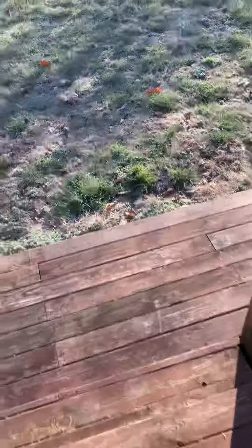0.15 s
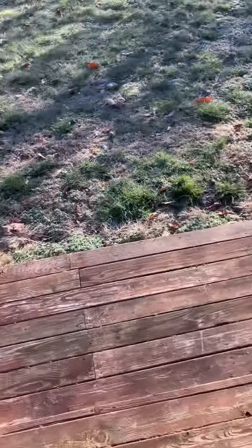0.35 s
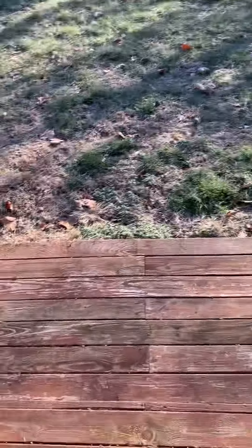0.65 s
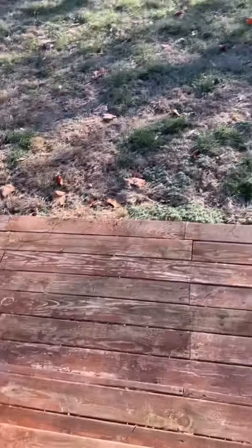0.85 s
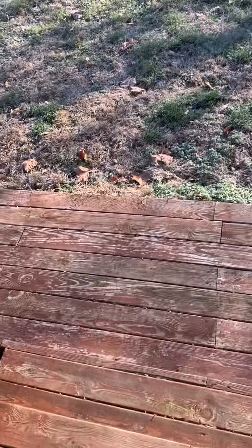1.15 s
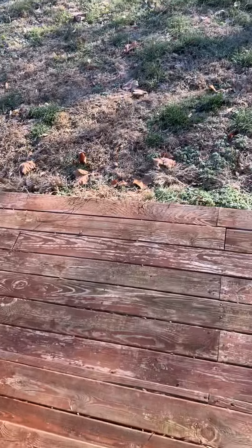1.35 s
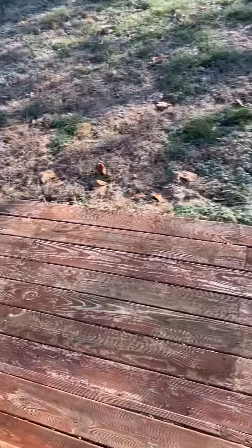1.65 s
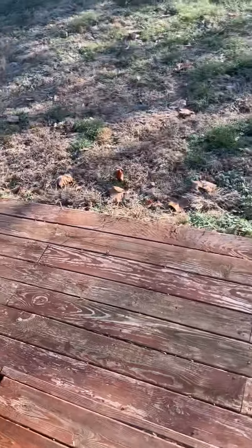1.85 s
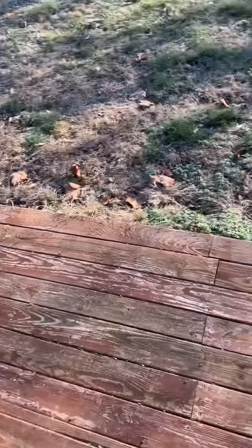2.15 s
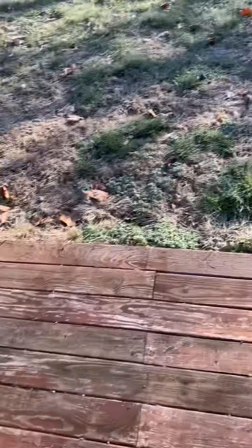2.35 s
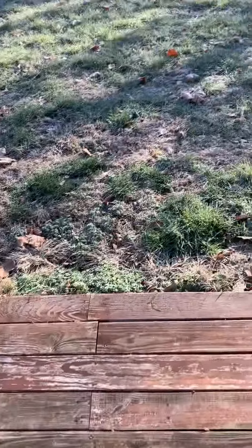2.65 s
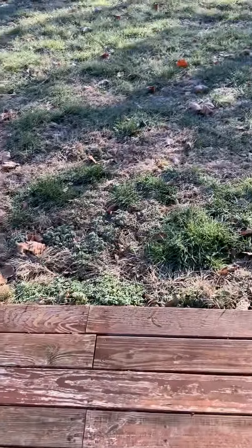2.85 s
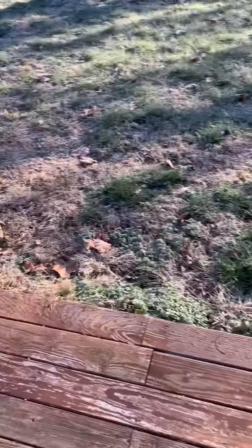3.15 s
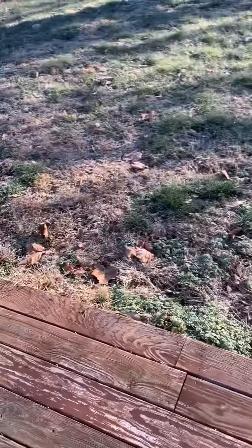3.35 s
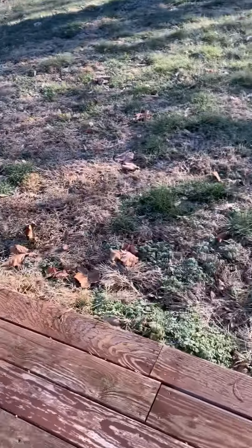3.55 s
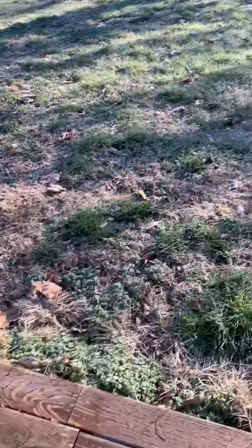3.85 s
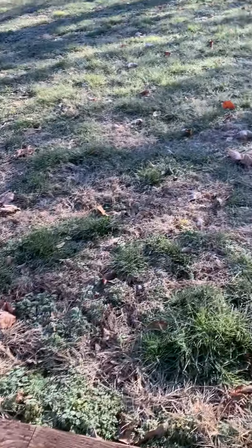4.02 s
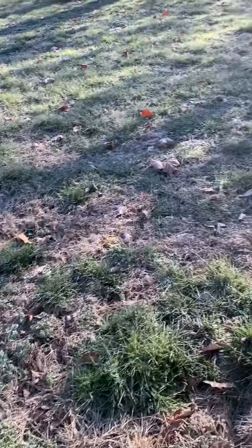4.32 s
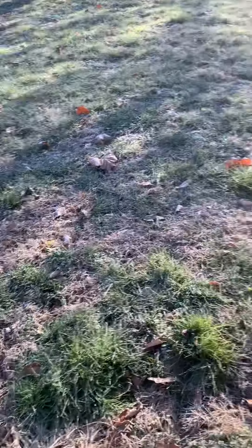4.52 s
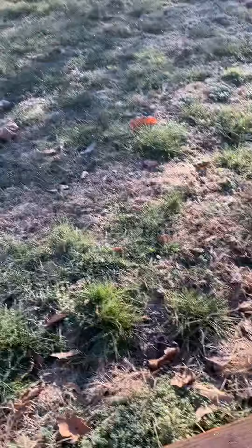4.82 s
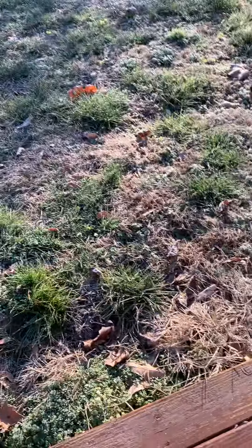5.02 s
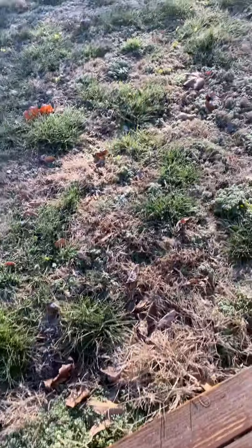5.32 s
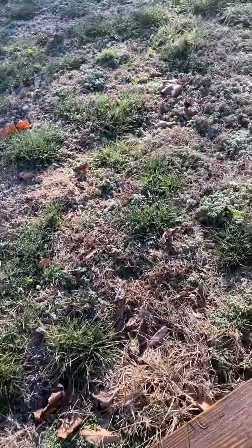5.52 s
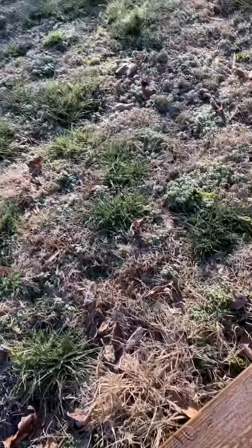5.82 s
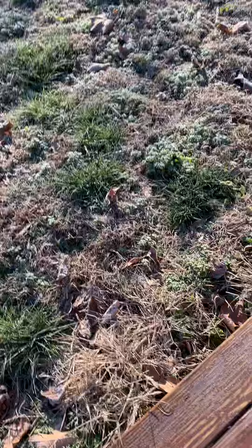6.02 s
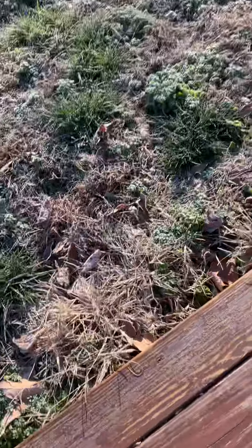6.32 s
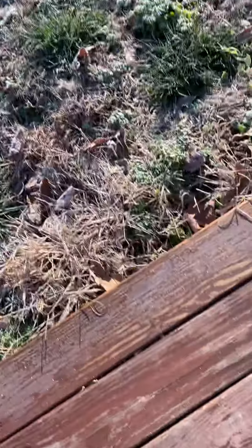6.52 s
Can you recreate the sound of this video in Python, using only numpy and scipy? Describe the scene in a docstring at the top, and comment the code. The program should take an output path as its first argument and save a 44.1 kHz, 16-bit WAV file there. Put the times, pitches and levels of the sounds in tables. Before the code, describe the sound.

A handheld microphone catches hard soles on loose deck boards: small clicks, short scrapes, woody knocks and low frame thumps at irregular intervals. The two heaviest steps boom briefly beneath the boards. A jacket swishes softly between steps, and fingers tick and rub on the held device, most clearly at the start and end. The quiet yard adds only soft hiss and a low distant rumble.

```python
"""Slow footsteps on a wooden garden deck: heel and sole click (noise bursts, short high modes),
planks knock and the frame thumps (struck modes, damped swings), grit cracks, soft scrapes swell.
The walker holds a phone: fingers tick (quick falling chirps) and slide on it (decaying noise).
A jacket rustles (noise in swells); the yard hisses and rumbles faintly (steady coloured noise)."""
import sys
import numpy as np
from scipy import signal
from scipy.fft import rfft, irfft, next_fast_len
from scipy.io import wavfile
from scipy.ndimage import uniform_filter1d

SR = 44100
rng = np.random.default_rng(int(sys.argv[2]) if len(sys.argv) > 2 else 0)


def to_wav(s):
    """Save 16-bit WAV."""
    ch = np.atleast_2d(s).T  # columns
    pcm = np.round(np.clip(ch, -1, 1) * 32767)  # PCM
    wavfile.write(sys.argv[1], SR, pcm.astype(np.int16))


N = 294145
T = np.arange(int(0.5 * SR)) / SR  # time axis of one event, s
LEVEL_WINDOW = int(0.025 * SR)  # samples


def undb(db):
    """Decibels to gain."""
    return 10 ** (np.asarray(db) / 20)


def spectrum(points, hz):
    """Gain at hz, interpolated in dB over log frequency."""
    f, db = np.transpose(points)
    return undb(np.interp(np.log(hz + 1), np.log(f), db))


def shape(x, gain):
    """Filter x by gain(hz), which may be complex."""
    size = next_fast_len(x.shape[-1] + len(T))
    filtered = rfft(x, size) * gain(np.fft.rfftfreq(size, 1 / SR))
    return irfft(filtered, size)[..., :x.shape[-1]]


# stereo width [f/Hz, side minus mid/dB]
WIDTH = [(60, -26.5), (150, -25), (280, -12), (500, -2.5), (1200, -0.5), (3000, -1)]


def pair(mid, side, wide_db=0):
    """Left and right from mid and side; WIDTH makes the bass alike and the treble less so."""
    ratio = lambda f: spectrum(WIDTH, f) * undb(wide_db)
    mid = shape(mid, lambda f: 1 / np.hypot(1, ratio(f)))
    side = shape(side, lambda f: ratio(f) / np.hypot(1, ratio(f)))
    return np.array([mid + side, mid - side])


def noise(points, size, wide_db=0):
    """Coloured stereo noise of rms 1."""
    white = pair(*rng.standard_normal((2, size)), wide_db)
    x = shape(white, lambda f: spectrum(points, f))
    return x / x.std()


def walk(rate_hz):
    """Smoothed random steps with a spread near 1."""
    k = max(int(SR / rate_hz), 1)
    steps = np.repeat(rng.standard_normal(N // k + 1), k)
    return 1.04 * uniform_filter1d(steps, k)[:N]


def level(x, db):
    """Set the rms over the first LEVEL_WINDOW."""
    return x * undb(db) / np.sqrt(np.mean(x[..., :LEVEL_WINDOW] ** 2))


def add(out, s, x):
    """Mix x into out from time s."""
    i = int(s * SR)
    x, i = x[:, max(-i, 0):], max(i, 0)
    out[:, i:i + x.shape[-1]] += x[:, :N - i]


def flicker(x, depth_db):
    """Neighbouring pitches of a noise flicker independently; overall rms is kept."""
    cells = signal.stft(x, nperseg=512)[2]
    chance = uniform_filter1d(rng.standard_normal(cells.shape[1:]), size=3, axis=0)
    y = signal.istft(cells * undb(depth_db * chance / chance.std()))[1][:, :N]
    return y * x.std() / y.std()


SWELL_POWER = 1.8  # 1 is a pointed swell, 2 a bell


def swell(middle_s, half_s):
    """Smooth rise and fall, peak 1."""
    return np.exp(-np.abs((np.arange(N) / SR - middle_s) / half_s) ** SWELL_POWER)


def favour(hz, centre_hz, below_db, above_db):
    """Spot and hardness of a contact favour one register; slopes in dB per octave."""
    octaves = np.log2((hz + 1) / centre_hz)
    return undb(np.minimum(below_db * octaves, -above_db * octaves))


def uneven(x, spacing_hz, depth_db):
    """Each spot of the deck has its own spectral peaks and hollows."""
    db = depth_db * rng.standard_normal(size=256)
    return shape(x, lambda f: undb(np.interp(f / spacing_hz, np.arange(len(db)), db)))


def disperse(x, lag_s):
    """Treble first, as in bending waves; the delay is lag_s at 1 kHz and goes as 1 / sqrt(f)."""
    return shape(x, lambda f: np.exp(-4j * np.pi * lag_s * np.sqrt(1000 * f)))


def ring(modes, colour, scatter_db, wide_db=-4):
    """Struck decaying modes, weighted by colour(hz), each with its own phase at either microphone."""
    hz, db, t60 = np.transpose(modes)[:, :, None]
    gain = undb(db + scatter_db * rng.standard_normal(hz.shape)) * colour(hz)
    phase = rng.uniform(0, 2 * np.pi, hz.shape)
    turn = np.arctan(spectrum(WIDTH, hz) * undb(wide_db)) * rng.choice([-1, 1], hz.shape)
    wave = gain * np.exp((2j * np.pi * hz - np.log(1000) / t60) * T + 1j * phase)
    return np.array([(wave * np.exp(1j * side * turn)).imag.sum(axis=0) for side in (1, -1)])


# open-air hiss and distant rumble [f/Hz, density/dB per Hz]
AIR = [(100, 1), (300, 0.5), (1000, -2), (2000, -5.5), (4000, -22.5), (5800, -15.5), (7200, -50),
       (16000, -53)]
RUMBLE = [(20, -58), (32, -36), (38, 1), (60, -2.5), (105, 1), (160, -4.5), (230, -15), (400, -32),
          (1500, -50)]


def yard(hiss_db=-57.0, rumble_db=-49.0):
    """Open air: soft flickering hiss and a wavering distant rumble."""
    hiss = flicker(noise(AIR, size=N), depth_db=3.0) * undb(hiss_db + 0.22 * walk(6.7))
    rumble = noise(RUMBLE, size=N, wide_db=8.5) * undb(rumble_db + 1.0 * walk(6.4))
    return hiss + rumble


# crisp and soft parts of the cloth [f/Hz, density/dB per Hz]
CLOTH = [(200, -26), (1500, -30), (3500, -5.5), (5000, -4.5), (6400, -3), (7600, -13), (9000, -13.5),
         (12000, -13), (16000, -22)]
SWISH = [(200, 7.5), (600, 4.5), (1500, 1), (2600, 0), (3800, 0), (4800, -5.5), (7000, -16), (16000, -90)]
# limb swings [middle t/s, half length/s, level before the part gains/dB, crisp re soft/dB]
SWINGS = [(0.19, 0.094, -55, 0.5), (0.547, 0.085, -69, 5.5), (1.17, 0.18, -61.5, 4.5),
          (1.377, 0.75, -60.5, -5), (1.805, 0.58, -58.5, -9), (2.45, 0.12, -56.5, -1),
          (2.846, 0.22, -65.5, 5), (3.298, 0.26, -56.5, -4.5), (3.745, 0.13, -54, -8.5),
          (4.12, 0.6, -58, -7.5), (4.715, 0.06, -56.5, -8), (5.108, 0.2, -59.5, -5.5),
          (5.866, 0.15, -55, 3), (5.987, 0.19, -52, 1.5), (6.187, 0.24, -65, 14), (6.644, 0.27, -60, 12.5)]
SOFT_GAIN_DB, CRISP_GAIN_DB = 4, -1
REST_DB, REST_CRISP_DB = -66, -31  # sliding that never stops, before the gains; crisp re soft


def jacket(grain_db=1.0, flutter_db=2.5, flicker_db=2.5):
    """Cloth slides over cloth in small catches, swelling with each swing of a limb."""
    soft_power = undb(REST_DB) ** 2
    crisp_power = undb(REST_DB + REST_CRISP_DB) ** 2
    for s, half_s, db, crispness_db in SWINGS:
        power = (undb(db) * swell(s, half_s)) ** 2
        soft_power = soft_power + power
        crisp_power = crisp_power + power * undb(crispness_db) ** 2
    catches_db = grain_db * walk(600) + flutter_db * walk(40)
    crisp = noise(CLOTH, size=N, wide_db=1.0) * np.sqrt(crisp_power) * undb(CRISP_GAIN_DB)
    swish = noise(SWISH, size=N, wide_db=1.0) * np.sqrt(soft_power) * undb(SOFT_GAIN_DB)
    return flicker((crisp + swish) * undb(catches_db), flicker_db)


# skin on the phone [f/Hz, density/dB per Hz]
FINGER = [(80, 1.5), (250, 2), (1300, -3.5), (2400, -6.5), (6000, -16), (16000, -79)]


def rub(decay_s):
    """Skin slides on the phone: decaying noise, nearly all side signal."""
    return noise(FINGER, size=len(T), wide_db=47.5) * np.exp(-T / decay_s)


TAP_LEAD_S = 0.003  # lead before the peak of the tick, room for its smooth start
CHIRP_LAG_S = 0.003  # chirp delay at 1 kHz


def tap(bright_hz, rub_db=-14, rub_s=0.011, low_hz=190, skin_hz=4200):
    """A soft tick heard as a quick falling chirp, opposite in the two channels, plus a little rub."""
    def colour(f):
        high_pass = f / np.hypot(f, low_hz)
        return high_pass / np.hypot(1, (f / bright_hz) ** 2) / np.hypot(1, (f / skin_hz) ** 2)

    impulse = signal.unit_impulse(len(T), int(TAP_LEAD_S * SR))
    tick = disperse(shape(impulse, colour), CHIRP_LAG_S) * np.array([[1], [-1]])
    return level(tick, 0) + level(rub(rub_s), rub_db)


# finger taps [t/s, level/dB, dull above f/Hz]
TAPS = [(0.017, -42, 1210), (0.333, -53, 700), (0.355, -69.5, 2500), (0.376, -50, 820), (0.424, -51, 700),
        (0.925, -49, 1200), (1.392, -49, 1100), (1.486, -45, 1090), (1.678, -46.5, 1144),
        (2.522, -56, 1500), (2.789, -49, 1100), (2.869, -55, 890), (2.952, -51, 1110), (3.19, -51, 1117),
        (3.542, -51, 1300), (5.401, -54, 1200), (5.775, -48.5, 2400), (6.001, -43.5, 1200),
        (6.118, -47, 1200), (6.447, -51, 1200), (6.481, -45, 2200), (6.606, -38, 2200), (6.648, -41, 1800),
        (6.666, -46.5, 1460)]
# finger slides [t/s, level/dB, decay/s]
SLIDES = [(0.19, -54, 0.16), (0.331, -52.5, 0.049), (6.12, -46.5, 0.49), (6.25, -37.5, 0.037)]


def fingers():
    """Dull ticks and rubs of fingers on the phone, opposite in the two channels."""
    out = np.zeros((2, N))
    for s, db, bright_hz in TAPS:
        add(out, s - TAP_LEAD_S, level(tap(bright_hz), db))
    for s, db, decay_s in SLIDES:
        add(out, s, level(rub(decay_s), db))
    return out


# hard sole on wood [f/Hz, density/dB per Hz]
CLICK = [(500, 4), (1500, 9.5), (3300, 5.5), (4200, -1.5), (5300, 15), (6500, 4), (7800, -4.5),
         (10000, 4.5), (13000, -8), (14800, -2), (16000, -14)]
# short high modes of the sole on wood [f/Hz, level/dB, t60/s]
SOLE = [(3200, -2, 0.02), (4210, -9, 0.017), (5320, 6, 0.015), (5100, 2.5, 0.0089), (5450, 1.5, 0.023),
        (6300, 6, .018), (6880, 4.5, 0.011), (7940, 1.5, 0.014), (10500, -23, .009), (12100, -1, 0.012),
        (13400, -9, .012)]


def click(length_s, grain_db=5, tail_db=-23, tail_s=0.025, ring_db=-5, rise_s=0.0001,
          usual_s=0.0057, uneven_db=5.0):
    """Many tiny contacts and a short high ring; a brief contact is a dry snap."""
    t = T[:len(T) // 4]
    grains = undb(grain_db * np.repeat(rng.standard_normal(len(t)), 16)[:len(t)])
    fullness = np.sqrt(min(length_s / usual_s, 1))
    contacts = grains * np.exp(-2 * t / length_s)
    tail = fullness ** 2 * undb(tail_db) * np.exp(-t / tail_s)
    burst = uneven(noise(CLICK, size=len(t)), spacing_hz=425, depth_db=uneven_db) * (contacts + tail)
    hz, db, t60 = np.transpose(SOLE)[:, :, None]
    phase = rng.uniform(0, 2 * np.pi, hz.shape)
    tone = np.sum(undb(db - 60 * t / t60) * np.sin(2 * np.pi * hz * t + phase), axis=0)
    return (level(burst, 0) + fullness * level(tone, ring_db)) * (1 - np.exp(-t / rise_s))


def grit(length_s):
    """A grain cracks, broad and dry, with hardly any ring."""
    return click(length_s, tail_db=-11, ring_db=-23, rise_s=0.00019, uneven_db=3.0)


# grit under the sole [t/s, level/dB, length/s]
GRIT = [(0.147, -52, 0.0023), (.181, -47.5, .004), (.821, -48, .004), (.847, -41.5, 0.0087),
        (0.851, -49, 0.0098), (.874, -45.5, 0.011), (1.804, -44, 0.0038), (2.118, -57, 0.002),
        (2.545, -46, 0.0031), (2.573, -33, .003), (2.592, -41, .003), (2.613, -48.5, .0015),
        (2.622, -45, .0013), (2.634, -48, .003), (2.663, -50.5, .004), (4.148, -50, .0014),
        (4.194, -50.5, .0023), (5.077, -57, .0029), (5.122, -56, 0.003), (5.61, -60, .0029),
        (6.0657, -43.5, 0.0018), (6.608, -44, 0.0015)]


def grit_cracks():
    """Grains crack under the sole."""
    out = np.zeros((2, N))
    for s, db, length_s in GRIT:
        add(out, s, level(grit(length_s), db))
    return out


# colour of scrapes and of the crack in knock() [f/Hz, density/dB per Hz]
WOOD = [(150, 8.5), (300, 5), (600, -8), (1100, -7), (2000, -5), (3500, -11), (6000, -9), (16000, -23)]


def scrape(half_s, centre_hz, grain_db=5):
    """Sticking and slipping contact: grainy noise in a short swell, centred in T."""
    t = T - T[-1] / 2
    grains = undb(grain_db * np.repeat(rng.standard_normal(len(T)), 40)[:len(T)])
    slips = pair(*rng.standard_normal((2, len(T)))) * grains
    colour = lambda f: spectrum(WOOD, f) * favour(f, centre_hz, below_db=6.5, above_db=9.0)
    rough = uneven(shape(slips, colour), spacing_hz=252.0, depth_db=1.0)
    return rough / rough.std() * np.exp(-(t / half_s) ** 2 / 2)


# short scrapes and soft brushing [middle t/s, half length/s, level/dB, centre f/Hz]
SCRAPES = [(0.16, 0.0017, -47, 1110), (0.183, 0.01, -42.5, 1290), (0.189, 0.07, -51, 880),
           (0.862, 0.016, -47.5, 2000), (1.049, 0.0014, -41, 2700), (1.105, 0.049, -49.5, 700),
           (1.272, 0.0081, -44.5, 1800), (1.277, 0.035, -45.5, 695), (1.884, 0.028, -44.5, 690),
           (2.380, 0.0013, -40, 1070), (2.559, 0.0072, -36, 890), (2.573, 0.0053, -32, 800),
           (2.607, .015, -54, 3000), (2.639, 0.003, -35.5, 2400), (2.656, 0.004, -41, 2000),
           (2.681, 0.015, -53, 1800), (2.702, 0.025, -42.5, 526), (3.376, 0.0044, -31, 2820),
           (3.407, 0.022, -43.5, 1900), (3.42, 0.0048, -48, 2400), (3.46, 0.015, -49, 1300),
           (4.103, 0.0014, -28, 1890), (4.181, 0.0011, -31.5, 4380), (5.921, 0.052, -45.5, 3280),
           (6.129, 0.049, -54.5, 2000), (6.409, 0.034, -53.5, 1320), (6.56, 0.073, -50.5, 1560),
           (6.598, 0.013, -46.5, 700)]


def scrapes():
    """Short scrapes and soft brushing of sole, cloth and fingers."""
    out = np.zeros((2, N))
    for s, half_s, db, hz in SCRAPES:
        add(out, s - T[-1] / 2, undb(db) * scrape(half_s, hz))
    return out


# brief dips in the background [middle t/s, half length/s, level/dB]
DIPS = [(0.357, 0.043, -21), (0.929, 0.014, -16), (1.394, 0.014, -26), (2.788, 0.015, -16),
        (5.78, 0.02, -17), (6.267, 0.031, -46)]
DIP_ABOVE_HZ, DIP_BELOW_HZ = 180, 1900


def dip(x):
    """The middle band of the background dips briefly."""
    band = lambda f: f ** 2 / (f ** 2 + DIP_ABOVE_HZ ** 2) / (1 + (f / DIP_BELOW_HZ) ** 4)
    dip_db = sum(db * swell(s, half_s) for s, half_s, db in DIPS)
    return x - shape(x, band) * (1 - undb(dip_db))


def foot_swing(hz, cycles, wide_db=-3):
    """The board under the shoe: damped by the foot, it swings for only a few cycles."""
    turn = np.arctan(spectrum(WIDTH, hz) * undb(wide_db)) * np.array([[1], [-1]])
    age = hz * T / cycles
    return age * np.exp(-age) * np.sin(2 * np.pi * hz * T + turn)


# plank modes [f/Hz, level/dB, t60/s]
PLANK = [(312.4, 4, 0.12), (360.8, 1, 0.17), (458, -14, 0.063), (480.5, -3, 0.124), (521, 1.5, 0.15),
         (588, 3.5, 0.095), (580, -8, 0.066), (746, -6.5, 0.16), (848, 3, 0.072), (943, -3, 0.08),
         (1096, -7.5, 0.22), (1105, -10, 0.17), (1353, 1.5, 0.054), (1384, 3, 0.076), (1587, 7.5, 0.032),
         (1810, 1.5, 0.048), (2090, -13.5, 0.018), (2580, -4, 0.038), (2774, -0.5, 0.027),
         (3125, 9.5, 0.015)]


def knock(centre_hz, swing_db=-1, cycles=1.4, crack_db=-3, crack_s=0.0059, rise_s=0.00035):
    """The struck plank swings and rings in its modes over a dense, quickly dying crack."""
    modes = np.array(PLANK) * [1 + 0.025 * rng.standard_normal(), 1, 1]  # no two planks alike
    tone = ring(modes, lambda f: favour(f, centre_hz, below_db=5.0, above_db=5.0), scatter_db=4.5)
    crack = shape(noise(WOOD, size=len(T)), lambda f: favour(f, centre_hz, below_db=8.0, above_db=7.0))
    crack = uneven(crack, spacing_hz=130.8, depth_db=6.5) * np.exp(-T / crack_s)
    plank = level(foot_swing(centre_hz, cycles), swing_db) + level(tone, 0) + level(crack, crack_db)
    return plank * (1 - np.exp(-T / rise_s))


# modes of joists and whole deck [f/Hz, level/dB, t60/s]
FRAME = [(60.7, 0, 0.25), (89.5, -4, .3), (107.6, 4, 0.35), (159.6, -3, 0.17), (184.2, -1.5, 0.11),
         (230, -7.5, .1), (261, 1, 0.11)]


def thump(centre_hz, rise_s=0.005, cycles=0.74, frame_db=-8):
    """The weight bends the deck, and the joists ring on."""
    frame = ring(FRAME, lambda f: favour(f, centre_hz, below_db=6.0, above_db=3.5), scatter_db=4.5)
    bump = level(foot_swing(centre_hz, cycles), 0) + level(frame, frame_db)
    return bump * (1 - np.exp(-(T / rise_s) ** 2))


WEIGHT_LAG_S = 0.0018  # thump after knock
# weight shifts [t/s, thump level/dB, thump centre f/Hz, knock level/dB, knock centre f/Hz]
SHIFTS = [(0.572, -73, 152, -51.5, 950), (1.075, -56, 192, -44, 496), (1.099, -43.5, 129, -41, 433),
          (1.141, -42, 105, -64, 423), (1.295, -51, 116, -65, 423), (1.636, -45.5, 122, -51.5, 427),
          (1.829, -39.5, 125, -37, 420), (2.333, -43.5, 104, -50, 900), (3.24, -45.5, 118, -49, 1100),
          (3.281, -41, 184, -52, 600), (3.892, -51, 158, -48.5, 403), (4.808, -39.5, 64.6, -72, 423),
          (5.04, -37.5, 67, -61, 423)]


def weight_shifts():
    """The deck gives as weight shifts onto a planted foot."""
    out = np.zeros((2, N))
    for s, thump_db, thump_hz, knock_db, knock_hz in SHIFTS:
        add(out, s, level(knock(knock_hz), knock_db))
        add(out, s + WEIGHT_LAG_S, level(thump(thump_hz), thump_db))
    return out


# modes of one board [multiple of lowest ring, level/dB, t60/s if the lowest is 1 kHz]
BOARD = [(1, 1, 0.064), (1.243, -3, 0.032), (1.53, -2, 0.021), (1.89, -6.5, 0.06)]


def board(hz, scatter_db=3.0):
    """The one board that was hit sings briefly in its own modes; high boards die sooner."""
    modes = np.array(BOARD) * [hz, 1, np.sqrt(1000 / hz)]
    return ring(modes, np.ones_like, scatter_db, wide_db=-5)


# short soft scrape swelling around each strike; level is for a 0 dB knock, growth in dB per dB
HALO_LEAD_S, HALO_HALF_S, HALO_DB, HALO_HZ, HALO_GROWTH = 0.000973, 0.0078, -27, 2600, 0.48
SCATTER_DB, SCATTER_S = -26.5, 0.056  # finer grit: level re click, time it falls within
# heel and sole strikes [t/s, thump level/dB, thump centre f/Hz, knock level/dB, knock centre f/Hz,
# click level/dB, click length/s, board ring f/Hz, ring level/dB]
STEPS = [ (1.246, -61, 240, -41.5, 2380, -42, 0.019, 2290, -52),
         (1.2503, -45, 253, -35, 2670, -35, 0.004, 2260, -56),
         (1.263, -43.5, 230, -36, 527, -44, 0.0018, 1155, -43),
         (1.275, -45, 139, -40, 965, -56, .005, 515, -39),
         (1.756, -56, 130, -34.5, 1430, -31.5, 0.0061, 1110, -32),
         (1.8117, -57, 232, -33, 2650, -27.5, 0.0032, 2180, -38.5),
         (1.816, -39, 196, -28.5, 1014, -31.5, 0.0064, 1027, -32.5),
         (2.562, -27.5, 218, -22.5, 726, -24, 0.013, 569, -25.5),
         (2.566, -19.5, 101.8, -28, 405, -46, .005, 269, -27.5),
         (2.639, -43, 194, -40, 990, -46, .0049, 568, -41),
         (3.3267, -67, 119, -45, 1530, -45.5, 0.0026, 1630, -55),
         (3.375, -33.5, 156, -29.5, 285, -38, 0.0024, 567, -40.5),
         (3.408, -47, 125, -43.5, 2200, -45, .0095, 2700, -47),
         (3.419, -42, 238, -41, 3320, -44, 0.0047, 2900, -44),
         (3.421, -46, 262, -40.5, 1030, -48.5, 0.0046, 607, -44),
         (3.444, -42, 129, -45.5, 715, -49, .0036, 1300, -66),
         (4.101, -33.5, 181, -34, 653, -36.5, 0.0041, 446, -37.5),
         (4.18, -19.5, 146, -32, 380, -60, 0.002, 437, -32.5),
         (4.5932, -48.5, 257, -34, 1820, -39.5, .0011, 693, -45.5),
         (6.614, -38.5, 181, -33, 1530, -24.5, 0.00055, 953, -33.5)]


def strikes():
    """Heel and sole strike: soft scrape around click, knock and board ring, later thump, two grains."""
    wood, sole = np.zeros((2, 2, N))
    for s, thump_db, thump_hz, knock_db, knock_hz, click_db, click_s, ring_hz, ring_db in STEPS:
        halo = undb(HALO_DB + HALO_GROWTH * knock_db) * scrape(HALO_HALF_S, HALO_HZ)
        add(sole, s - HALO_LEAD_S - T[-1] / 2, halo)
        add(wood, s, level(knock(knock_hz), knock_db))
        add(wood, s, level(board(ring_hz), ring_db))
        add(wood, s + WEIGHT_LAG_S, level(thump(thump_hz), thump_db))
        add(sole, s, level(click(click_s), click_db))
        for delay in rng.random(size=2):
            add(sole, s + SCATTER_S * delay, level(grit(length_s=0.0023), click_db + SCATTER_DB))
    return wood, sole


def span(hz, t60, rise_s=0.008):
    """A smooth, deep hum that dies away, alike at both microphones."""
    hum = np.sin(2 * np.pi * hz * T) * np.exp(-np.log(1000) * T / t60)
    hum = hum * (1 - np.exp(-(T / rise_s) ** 2))
    return np.array([hum, hum])


# joist spans under full weight, the sway spreading to wider spans [t/s, f/Hz, level/dB, t60/s]
SPANS = [(2.573, 108.1, -27, .25), (4.185, 159.5, -33.5, 0.21), (4.211, 109, -38.5, 0.26),
         (4.245, 65.8, -38.5, 0.39)]


def span_hums():
    """Under the full weight a span of joists hums on."""
    out = np.zeros((2, N))
    for s, hz, db, t60 in SPANS:
        add(out, s, level(span(hz, t60), db))
    return out


def footsteps():
    """All contacts; bending waves carry the lower tones of the wood out later."""
    wood, sole = strikes()
    wood = wood + weight_shifts() + span_hums()
    sole = sole + grit_cracks() + scrapes()
    return disperse(wood, lag_s=0.000758) + sole


def under_deck(x, wet_db=-17, t60=0.19):
    """The hollow under the boards and the house wall return a short, dull tail."""
    # [f/Hz, density/dB per Hz]
    colour = [(50, -31), (200, -1), (600, -9), (2000, -14.5), (6000, -12), (16000, -21)]
    tail = noise(colour, size=len(T))
    tail = tail * np.exp(-np.log(1000) * T / t60) * (1 - np.exp(-T / 0.012))
    tail = tail / np.sqrt(np.sum(tail ** 2) / 2) * undb(wet_db - 3)
    return signal.fftconvolve(x, tail, axes=1)[:, :N]


def scene():
    """Deck with its tail, leaning left or right by register; fingers; dipped background."""
    steps = footsteps()
    steps = steps + under_deck(steps)
    # [f/Hz, left minus right/dB]
    lean = [(60, 0.5), (250, -3.5), (600, -3), (1200, -1.5), (2500, -2.5)]
    steps = shape(steps, lambda f: spectrum(lean, f) ** np.array([[0.5], [-0.5]]))
    return steps + fingers() + dip(jacket() + yard())


def record(dry):
    """In the treble both channels carry one signal, the right a little late; deep bass and top are cut."""
    lag_s, in_phase_hz, split_hz = 1 / 4150, 6900, 3900
    shared = lambda f: 1 / (1 + (split_hz / (f + 1)) ** 12)
    late = lambda f: np.sqrt(shared(f)) * np.exp(-2j * np.pi * (f - in_phase_hz) * lag_s)
    right = shape(dry[0], late) + shape(dry[1], lambda f: np.sqrt(1 - shared(f)))
    low_cut = signal.butter(4, 34, "highpass", fs=SR, output="sos")
    top_cut = signal.ellip(8, 0.2, 70, 16200, fs=SR, output="sos")
    sound = signal.sosfilt(low_cut, np.array([dry[0], right]))
    return signal.sosfilt(top_cut, sound)


dry = scene()
out = record(dry)
to_wav(out)
```